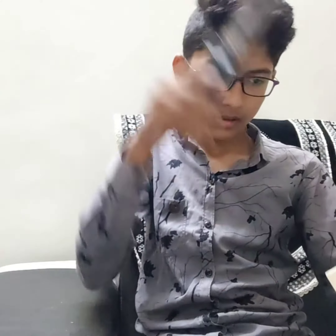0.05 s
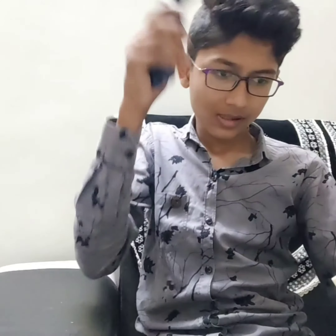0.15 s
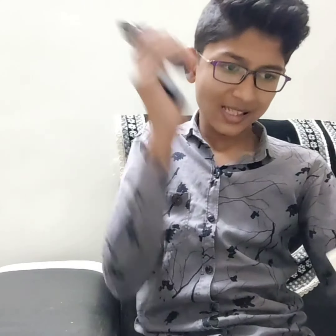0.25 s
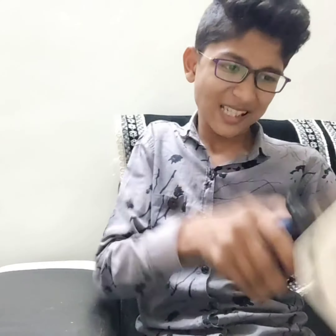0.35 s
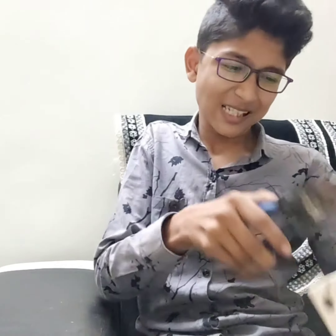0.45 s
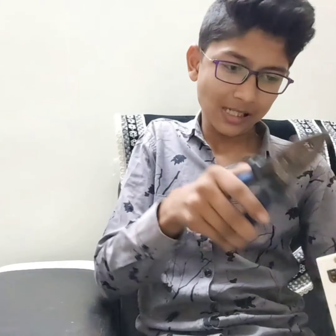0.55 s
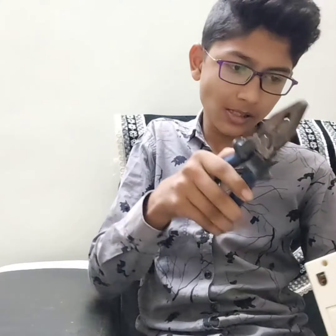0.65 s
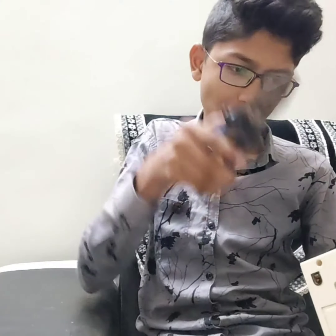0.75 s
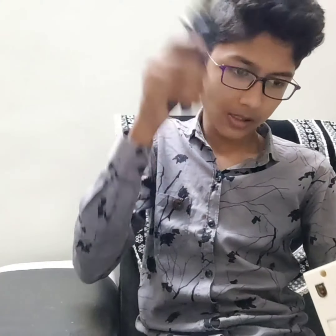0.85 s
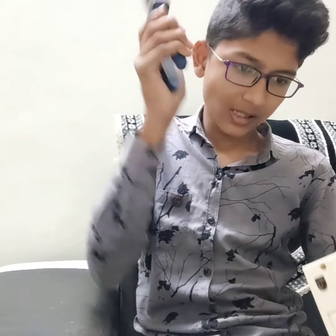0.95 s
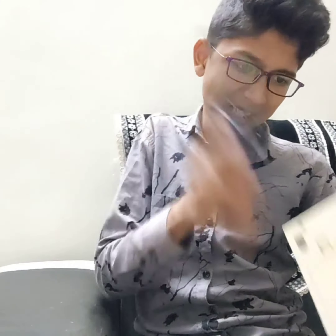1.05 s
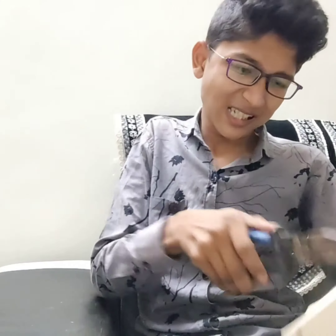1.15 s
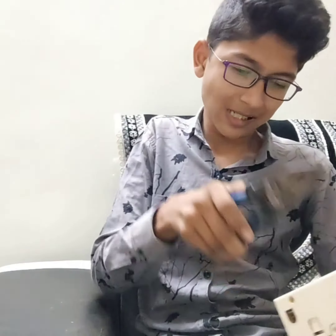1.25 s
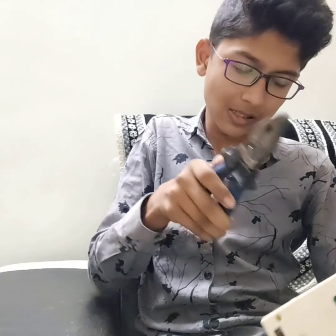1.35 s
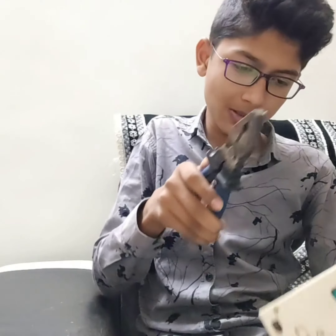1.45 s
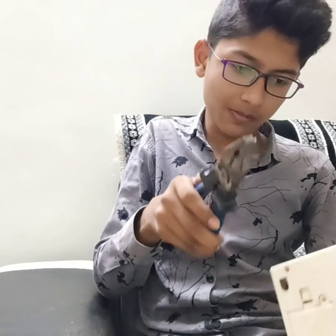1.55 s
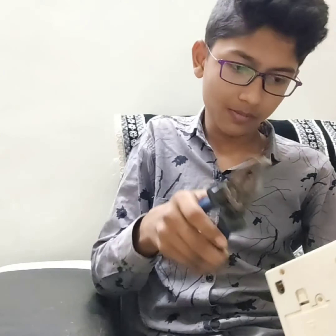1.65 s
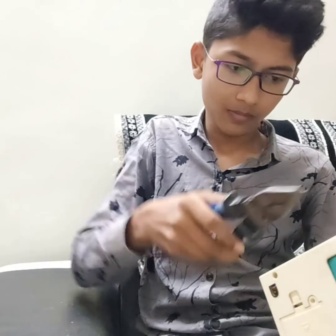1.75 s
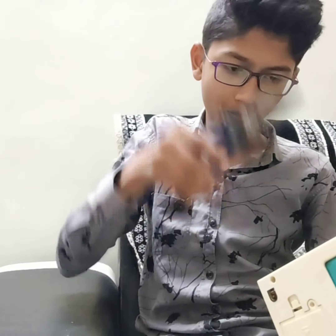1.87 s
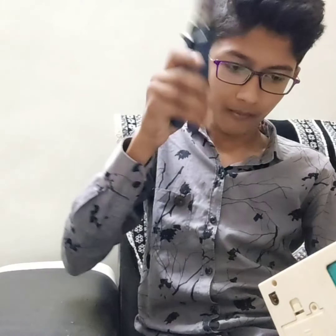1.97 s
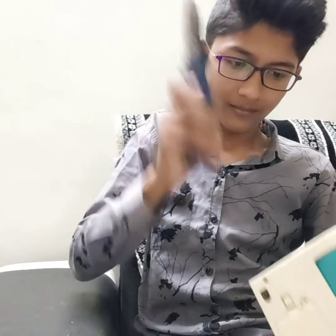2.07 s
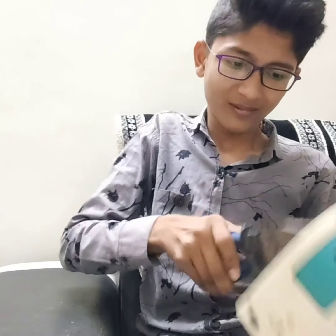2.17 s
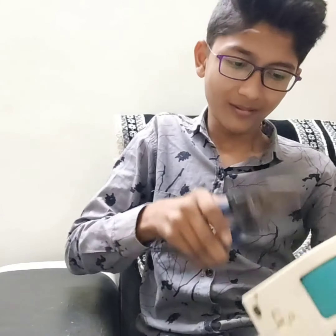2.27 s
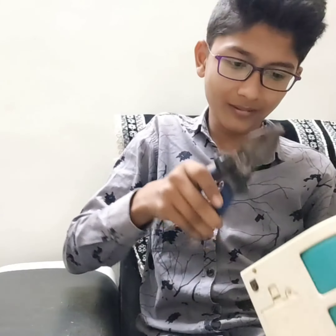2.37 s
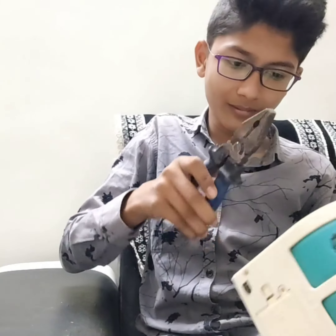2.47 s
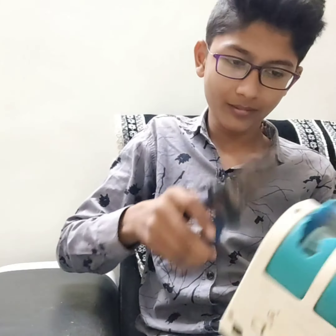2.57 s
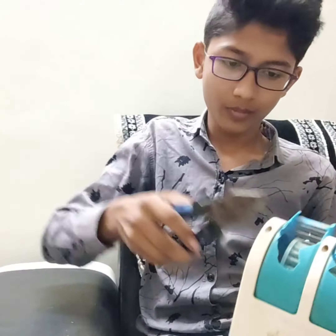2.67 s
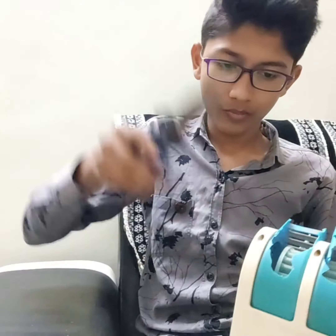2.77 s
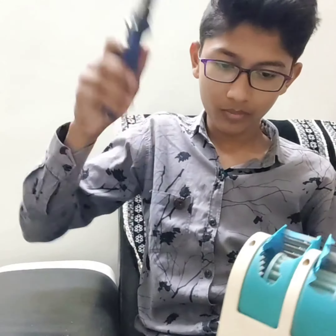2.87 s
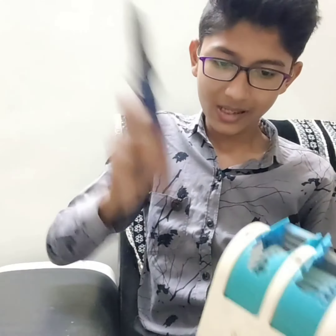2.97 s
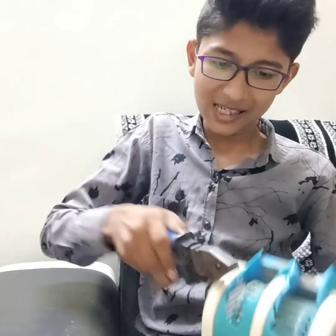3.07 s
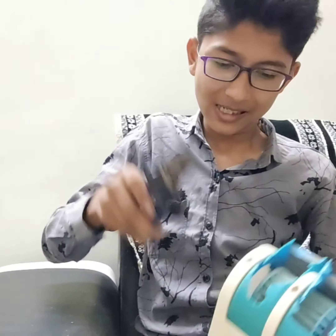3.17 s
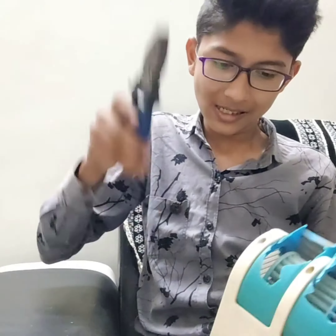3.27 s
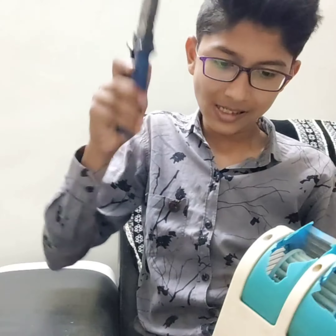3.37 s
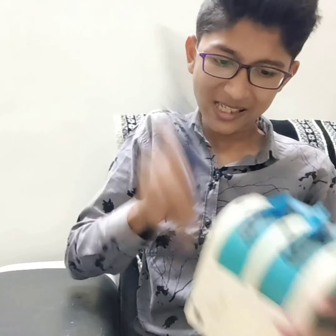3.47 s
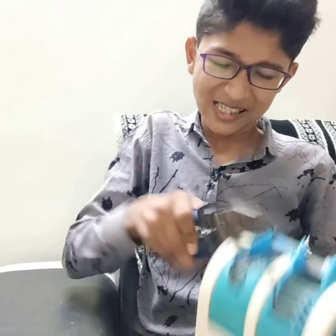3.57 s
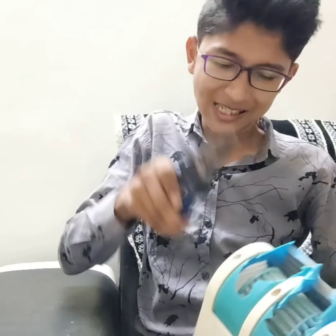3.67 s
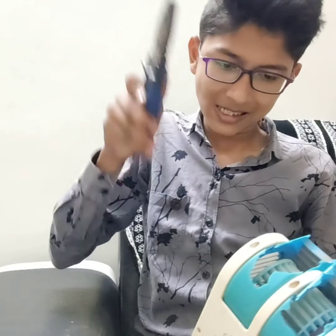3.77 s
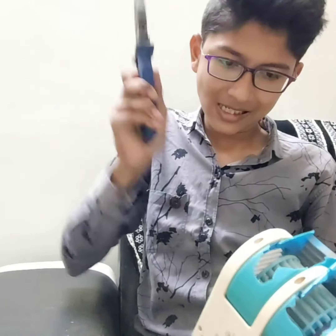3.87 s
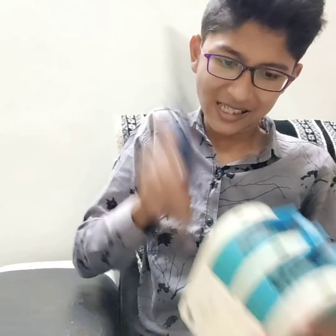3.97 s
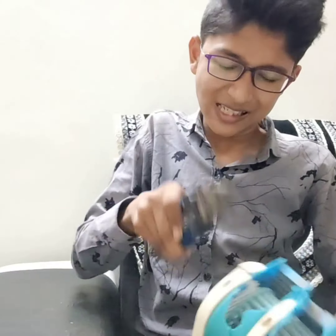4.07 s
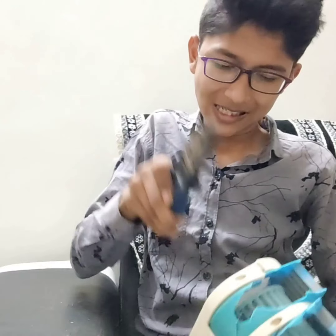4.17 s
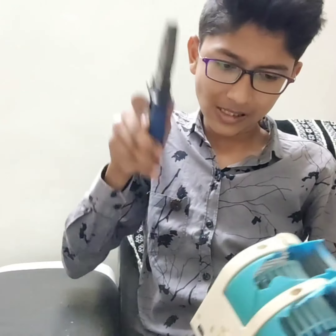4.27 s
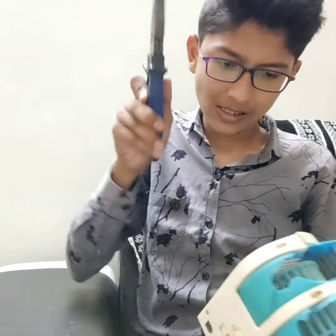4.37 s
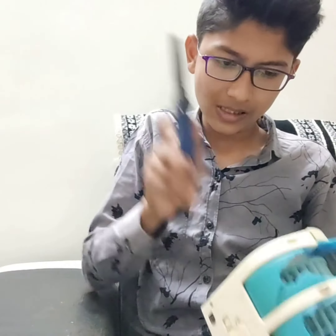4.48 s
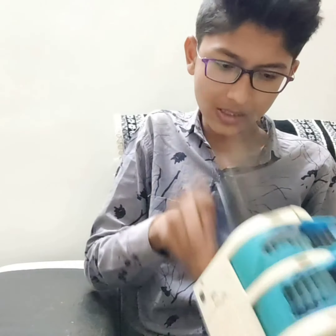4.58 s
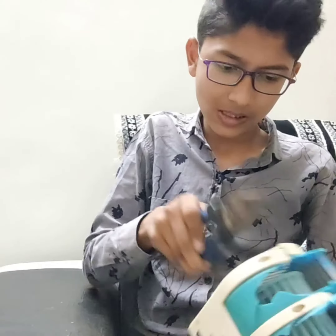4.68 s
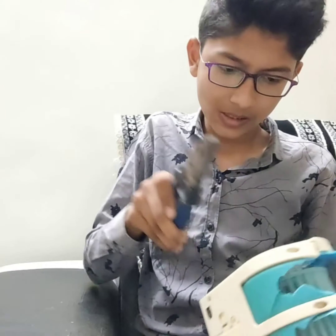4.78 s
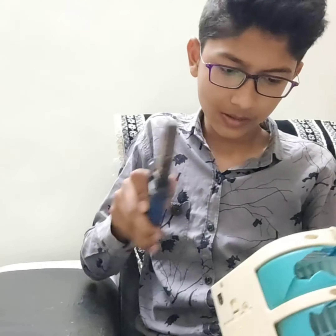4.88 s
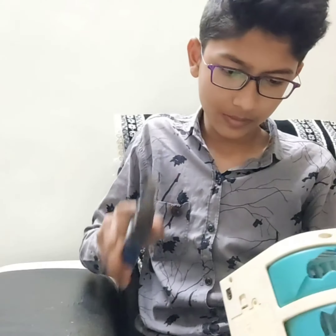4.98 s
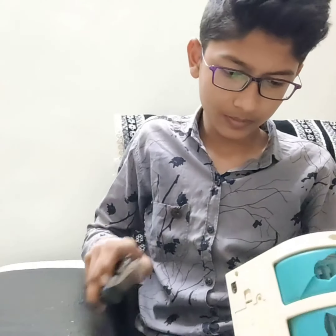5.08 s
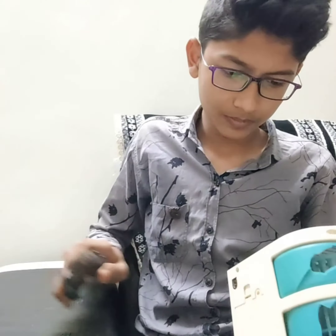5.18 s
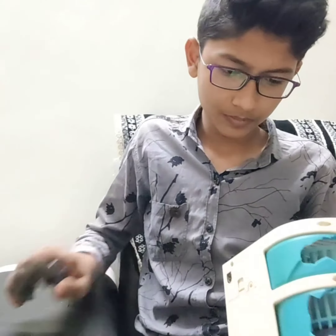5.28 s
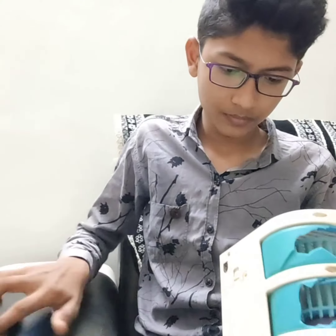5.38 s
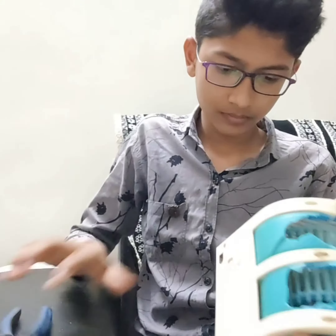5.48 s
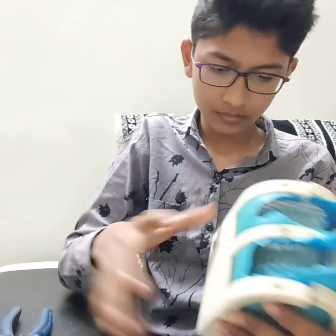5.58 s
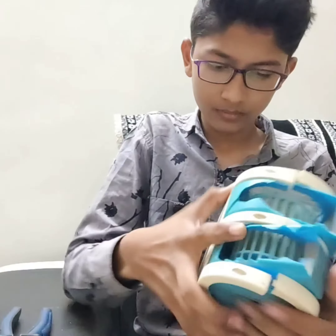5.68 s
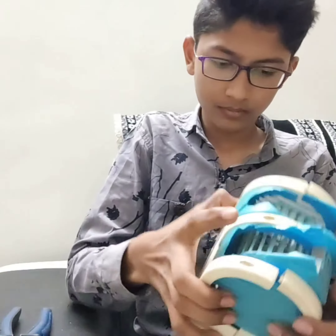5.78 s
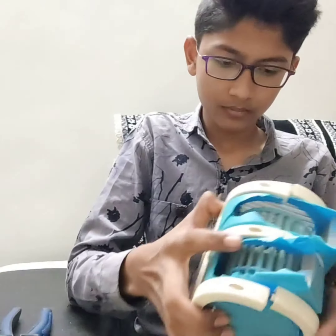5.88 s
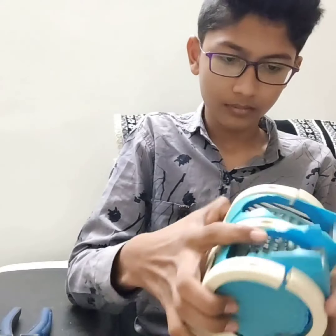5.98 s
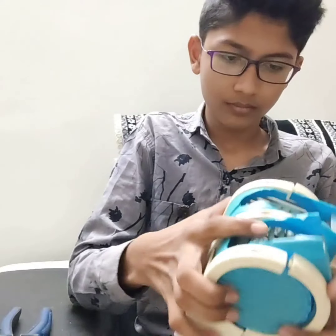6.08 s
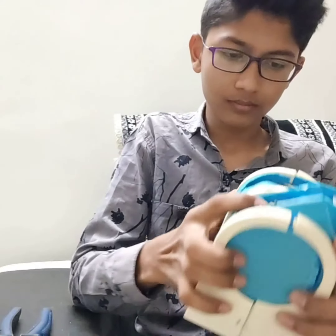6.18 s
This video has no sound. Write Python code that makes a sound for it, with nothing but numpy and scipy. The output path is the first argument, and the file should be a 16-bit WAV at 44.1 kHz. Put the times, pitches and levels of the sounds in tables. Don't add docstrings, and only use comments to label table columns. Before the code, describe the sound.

Splintery plastic blows with low lap thumps and hollow ringing, each filling an echoing hard-walled room over faint hiss. Thin steel clicks sit slightly left between early blows. The level ducks at each hit and recovers. The last crack is drier with loose pieces rattling, followed by a tool clacking onto a table, faint shard scratches and a final dull plastic knock.

```python
import sys
import numpy as np
from scipy import signal
from scipy.fft import rfft, irfft
from scipy.io import wavfile
from scipy.ndimage import uniform_filter1d, map_coordinates

SR = 44100
rng = np.random.default_rng(int(sys.argv[2]) if len(sys.argv) > 2 else 0)


def dump(signal):
    limited = np.clip(np.atleast_2d(signal).T, -1, 1)
    pcm = np.round(limited * 32767).astype(np.int16)
    wavfile.write(sys.argv[1], SR, pcm)


def field_ratio(decibels):
    return 10 ** (np.asarray(decibels, dtype=float) / 20)


N = 275079

# frequency in Hz, level in dB per Hz.
AIR_SPECTRUM = [(24, -42.5), (40, -11.5), (87, 1), (317, -4.5), (522, -8.5), (704, -5.5), (926, -13.5),
                (1080, -11.5), (1490, -18), (2220, -18.5), (3840, -27), (6160, -35), (6980, -24.5),
                (7910, -31), (15500, -38)]
# frequency in Hz, left-right likeness (-1 to 1).
AIR_LIKENESS = [(60, 0.92), (180, 0.94), (550, 0.67), (1650, 0.095), (4970, 0.16), (15000, -0.42)]
# centre in seconds, level in dB, half length in seconds.
SEAT_SHIFTS = [(.13, -49, 0.028), (.2, -48.5, .035), (.36, -52, .07), (.53, -44, .04), (.69, -41.5, 0.049),
               (.86, -46.5, 0.078), (1.122, -45.5, 0.058), (1.35, -50, 0.073), (1.67, -49, 0.058),
               (1.834, -46.5, 0.033), (2.15, -50, .04), (2.406, -45, .045), (2.572, -44.5, 0.023),
               (2.655, -49, .025), (2.745, -45, .035), (2.88, -45.5, 0.036), (3.043, -51, .04),
               (3.286, -51, 0.11), (3.44, -49.5, .025), (3.555, -53, .035), (3.97, -51, .035),
               (4.2, -57, .05), (4.6, -49, 0.041), (5.523, -44, 0.066), (5.96, -53, .05)]
# frequency in Hz, t60 in seconds.
ROOM_T60 = [(150, 0.37), (500, 0.49), (2000, 0.54), (6000, 0.51), (12000, 0.39), (16000, 0.37)]
# frequency in Hz, left-right likeness (-1 to 1).
ECHO_LIKENESS = [(100, .7), (500, 0.317), (1200, 0.021), (10000, 0.0088)]
# frequency in Hz, level over neighbours in dB.
STANDING_NOTES = [(318, 5), (480, 3), (577, 4), (632, 4), (668, 3), (733, 5), (824, 3), (868, 3), (908, 5),
                  (946, 4), (1096, 4), (1340, 3), (1540, 4), (1685, 4)]
# frequency in Hz, left-right difference in dB.
PORT_LEAN = [(100, 3.5), (500, -0.4), (2000, 0.7), (5000, 2.5), (9000, -2.5), (14000, 5.5)]
# start in seconds, level in dB, length in seconds.
TOOL_LAID = (5.447, -34.5, .03)
# start in seconds, peak in dB, crack t60 in seconds,
# treble tilt in dB per octave, room answer in dB.
HANDLING_KNOCKS = [(5.446, -36, .006, 1, -20), (5.4505, -20, .008, -1.5, -26), (5.461, -25, .015, -5, -11),
                   (5.572, -40, 0.0087, 1, -14), (5.686, -46, .05, 0.2, -5), (5.707, -40, .03, -1, -7),
                   (5.721, -39, .04, 1.2, -6), (5.965, -49, .04, 2, -9), (6.0761, -18, 0.013, -6.5, -14.5),
                   (6.0795, -21, .012, -7, -15.5), (6.083, -26.5, .012, -7, -16),
                   (6.14, -39.5, .012, 2, -14)]
# loudest time in seconds, level in dB, rise in seconds, fade in dB per second.
SHARD_SLIDES = [
    (5.48, -56, .015, 80),
    (5.735, -45.5, .035, 70),
    (5.96, -58, 0.066, 200),
    (6.077, -46.5, 0.0034, 500),
    (6.11, -61, .015, 60),
]
# frequency in Hz, width in Hz, level in dB.
HELD_MODES = [(574, 66, 1.5), (801, 70, 7), (1310, 100, 0), (2110, 150, -0.5)]
# start in seconds, peak in dB, ring frequency in Hz.
JAW_TICKS = [
    (1.8065, -21.5, 7020),
    (1.8096, -25, 7600),
    (1.9345, -39, 7000),
    (1.9557, -28, 7600),
    (2.086, -32, 7000),
    (2.158, -31, 7700),
    (2.165, -30, 7100),
    (2.1765, -37, 7600),
    (3.5194, -42, 6960),
    (4.0253, -38, 7100),
]
# start in seconds, force in dB before the gain control, thump in dB,
# treble tilt in dB per octave, room answer in dB.
SHELL_BLOWS = [
    (0.4216, 17.5, -13, 1.05, -7),
    (1.156, 18.5, -18.5, 0.9, -8.5),
    (2.199, 10, -18.5, 0.46, -5.5),
    (2.68, -8, -43, -1.5, -13),
    (3.108, 9, -16, 1.2, -4.5),
    (3.582, 13, -16, 1.2, -6.5),
    (4.053, 12.5, -18, 1.1, -8),
    (4.641, 12, -36, 0.3, -15),
]
# frequency in Hz, width in Hz, level in dB.
SHELL_MODES = [
    [(348, 26, -0.5), (684, 140, -2), (2230, 29, -5), (3075, 70, -1)],
    [(504, 94, 1.5), (750, 160, -1.5), (2180, 110, -9), (3660, 220, -9)],
    [(528, 97, -4.5), (888, 78, 2.5), (1520, 210, -1), (2320, 73, -6)],
    [(900, 180, -2), (1473, 30, 4.5), (3400, 180, -7.5)],
    [(732, 36, -3), (1520, 110, -4.5), (2050, 60, -1), (3040, 57, -8)],
    [(730, 62, 0), (970, 170, -3), (1513, 51, -2), (2250, 68, -9)],
    [(733, 29, -3), (894, 45, 1), (1740, 190, -0.5), (3266, 54, -4)],
    [(923, 60, 1), (1575, 130, -2), (3390, 39, -5)],
]
THUMP_NOTES_HZ = [135, 150, 215, 150, 118, 112, 115, 200]
# frequency in Hz, level in dB per Hz.
CRACK_SPECTRUM = [(150, -42), (250, -11), (450, -8), (490, -2), (658, -4.5), (717, -2.5), (867, -4),
                  (961, -5.5), (1250, -5.5), (3160, -5.5), (5690, -13), (8470, -9), (15500, -18.5)]
# frequency in Hz, level in dB per Hz.
THUMP_SPECTRUM = [(40, -31.5), (90, 3), (130, -3), (200, 2.5), (350, -6), (700, -15.5), (1400, -40.5),
                  (3000, -91.5)]
# start in seconds, level in dB before the gain control, length in seconds.
LAP_BOUNCES = [
    (.44, -8.5, .008),
    (.45, -10, 0.0054),
    (.461, -10, 0.0084),
    (1.177, -8.5, 0.007),
    (1.2, -7.5, .012),
    (3.596, -11, .008),
]
# start in seconds, level in dB,
# # crack t60 in seconds, tilt in dB per octave, index of the blow followed.
LATE_CONTACTS = [
    (2.686, -20, .13, -3, 3),
    (4.652, -1, .1, -2, 7),
    (4.736, -16, .07, -1.5, 7),
]

TOP_HZ, STEADY_TOP_HZ = 16750, 15600
STANDING_WIDTH_HZ = 18
STILL_DB = -60.5
ROCK_DB, ROCK_S = -46, .05
RUMBLE_DB, STIRRED_DB, STIRRED_S = -56, 4, .11
KNOCK_THUMP_DB = -32
JAW_PAN_DB, JAW_ECHO_DB = 3.5, -14
THUMP_S, CRACK_T60_S, PIECE_ROOM_DB = .02, .05, -12
KNEE_DB, DUCK_SHARE = -14, .6
HOLD_S, HOLD_S_PER_DB = .098, .0033


def unit(x):
    return x / np.sqrt(np.mean(x ** 2) + 1e-20)


def along(points, hz):
    f, v = np.transpose(points)
    return np.interp(np.log(hz + 1), np.log(f + 1), v)


def curve(rows):
    return np.interp(np.arange(N) / SR, *np.transpose(rows))


def wobble(rate):
    knots = rng.standard_normal(int(N * rate / SR) + 4)
    return map_coordinates(knots, [np.arange(N) * rate / SR])


def noise(size, gain, alike, order=1024):
    hz, t, z = signal.stft(rng.standard_normal((2, size)), SR, nperseg=order)
    turn = np.arccos(np.clip(along(alike, hz), -1, 1))[:, None] / 2
    mid, side = z[0] * np.cos(turn), z[1] * np.sin(turn)
    still = np.sqrt(np.mean(gain(hz[:, None], 0 * t[:1]) ** 2))
    shaped = np.array([mid + side, mid - side]) * gain(hz[:, None], t) / still
    return signal.istft(shaped, SR, nperseg=order)[1][:, :size]


def add(track, s, sound):
    skip = max(0, -round(s * SR))
    spot = track[:, max(0, round(s * SR)):][:, :sound.shape[1] - skip]
    spot += sound[:, skip:skip + spot.shape[1]]


def peak(hz, centre_hz, width_hz):
    return 1 / (1 + (2 * (hz - centre_hz) / width_hz) ** 2)


def sustained(hz):
    return 1 / (1 + (hz / STEADY_TOP_HZ) ** 200)


def room_tone():
    t = np.arange(N) / SR
    low = lambda hz: 1 / (1 + (hz / 450) ** 4)
    murmur = noise(N, lambda hz, _: peak(hz, 100, 100) * hz / (hz + 40), [(100, 0.51)], order=4096)
    murmur = murmur / np.sqrt(np.abs(uniform_filter1d(murmur ** 2, size=1600)) + .15)

    seat = field_ratio(STILL_DB + 2.5 * wobble(7))
    seat = seat + sum(field_ratio(db) * np.exp(-((t - s) / half_s) ** 2) for s, db, half_s in SEAT_SHIFTS)
    since = np.maximum(t - np.array(SHELL_BLOWS)[:, :1], 0) / STIRRED_S
    rock = since * STIRRED_S / ROCK_S
    seat = seat + field_ratio(ROCK_DB) * np.max(rock * np.exp(1 - rock), axis=0)
    murmur = unit(murmur) * field_ratio(1.5 * wobble(18) + 2.5) * seat

    stirred_db = STIRRED_DB * np.max(since * np.exp(1 - since), axis=0)
    rumble_gain = lambda hz, _: (field_ratio(along(AIR_SPECTRUM, hz)) * np.sqrt(low(hz))
                                 / (1 + (150 / (hz + 1)) ** 4))
    rumble = noise(N, rumble_gain, AIR_LIKENESS, order=4096)
    rumble = rumble * field_ratio(1.5 * wobble(10) + RUMBLE_DB + stirred_db + 2.0)

    hiss_gain = lambda hz, _: field_ratio(along(AIR_SPECTRUM, hz)) * np.sqrt(1 - low(hz)) * sustained(hz)
    hiss = noise(N, hiss_gain, AIR_LIKENESS)
    port = noise(N, lambda hz, _: peak(hz, 6900, 600), [(7000, .1)]) * field_ratio(-70)
    return murmur + rumble + hiss * field_ratio(.8 * wobble(5) - 55.5) + port


def thud(db, length_s, lap_hz=118):
    t = np.arange(SR // 5) / SR
    lumps = unit(field_ratio(2.5 * unit(uniform_filter1d(rng.standard_normal(len(t)), size=150))))
    push = noise(len(t), lambda hz, _: field_ratio(along(THUMP_SPECTRUM, hz)), [(100, 0.31), (400, .05)], order=2048)
    push = push * lumps
    push += 1.4 * np.sin(2 * np.pi * lap_hz * t + np.array([[0], [1.4]]))
    return field_ratio(db - 8.8 * (t / max(length_s, .003)) ** 2) * push * (1 - np.exp(-t / 0.00053))


def strike(thump_db, thump_s, crack_t60, tilt_db, modes, room_db, lap_hz=118, size=SR):
    t = np.arange(size) / SR
    short = t[:SR // 5]
    ring = lambda hz: np.sqrt(1 + sum(field_ratio(2 * db + 9.5) * peak(hz, c, w) for c, w, db in modes))
    small = rng.standard_normal(size=200)
    small_hz = np.geomspace(200, 16000, len(small))
    ripple = lambda hz: field_ratio(3.3 * np.interp(hz, small_hz, small) / (1 + hz / 7000))
    tilted = lambda hz: field_ratio(along(CRACK_SPECTRUM, hz) + tilt_db * np.log2((hz + 200) / 2000))
    colour = lambda hz: tilted(hz) * ring(hz) * ripple(hz)

    splinters = unit(field_ratio(4 * unit(uniform_filter1d(rng.standard_normal(len(short)), size=24))))
    crack = noise(len(short), lambda hz, _: colour(hz), [(300, 1.0), (3000, 0.1)]) * splinters
    crack = crack * field_ratio(-60 * short / max(crack_t60, .003)) * (1 - np.exp(-short / .0003))

    standing_db = lambda hz: sum(db * peak(hz, c, STANDING_WIDTH_HZ) for c, db in STANDING_NOTES)
    dips_db = lambda hz: 1.5 / (1 + (hz / 2000) ** 4) + 2.5 * peak(hz, 620, 350)
    notes = lambda hz: field_ratio(standing_db(hz) - dips_db(hz))
    fading = lambda hz, u: sustained(hz) * notes(hz) * field_ratio(-60 * u / along(ROOM_T60, hz))
    walls = noise(size, lambda hz, u: colour(hz) * fading(hz, u), ECHO_LIKENESS, order=4096)
    walls = field_ratio(room_db) * walls * (1 - np.exp(-t / 0.0051))

    for c, w, db in modes:
        turn = rng.uniform(0, 2 * np.pi) + rng.normal(0, 0.71, (2, 1))
        decay = np.exp(-np.pi * max(w, 25) * short) * (1 - np.exp(-short / 0.00088))
        crack += field_ratio(db - 9.5) * decay * np.sin(2 * np.pi * c * short + turn)
    thump = thud(thump_db + 6.5, thump_s * np.sqrt(118 / lap_hz), lap_hz)
    add(walls, 0, field_ratio(1.5) * crack + thump)
    return walls


def handling():
    out, t = np.zeros((2, N)), np.arange(N) / SR
    add(out, TOOL_LAID[0], thud(*TOOL_LAID[1:]))
    for s, db, crack_t60, tilt_db, room_db in HANDLING_KNOCKS:
        modes = HELD_MODES if s > 5.6 else []
        knock = strike(KNOCK_THUMP_DB, .03, crack_t60, tilt_db, modes, room_db, size=SR // 2)
        add(out, s, field_ratio(db - 2.5) * knock)
    grit = field_ratio(3.6 * wobble(rate=500) + 2.2 * wobble(rate=90))
    scratch_db = lambda hz: along(CRACK_SPECTRUM, hz) - 3.5 * np.log2(hz / 2000 + .3)
    shards = unit(grit * noise(N, lambda hz, _: field_ratio(scratch_db(hz)) * sustained(hz), [(1000, 0.21)]))
    motion = sum(field_ratio(db - fade * np.maximum(t - s, 0)) * np.exp(-(np.minimum(t - s, 0) / rise_s) ** 2)
                 for s, db, rise_s, fade in SHARD_SLIDES)
    return out + shards * motion


def jaws():
    out, t = np.zeros((2, N)), np.arange(SR // 3) / SR
    pan = field_ratio([[JAW_PAN_DB / 2], [-JAW_PAN_DB / 2]])
    for s, db, ring_hz in JAW_TICKS:
        bright = lambda hz: np.sqrt(2.5 * peak(hz, ring_hz, 350) + .6 / (1 + (9500 / (hz + 1)) ** 6))
        click = lambda hz, _: bright(hz) + .12 / (1 + (3500 / (hz + 1)) ** 6)
        tick = noise(len(t), click, [(5000, 0.25)]) * field_ratio(-60 * t / 0.0045)
        ring = field_ratio(-24 - 60 * t / .3 + 3 * wobble(rate=80)[:len(t)]) * np.sin(2 * np.pi * ring_hz * t)
        fading = lambda hz, u: bright(hz) * sustained(hz) * field_ratio(-60 * u / along(ROOM_T60, hz))
        echo = noise(len(t), fading, ECHO_LIKENESS)
        echo = field_ratio(JAW_ECHO_DB) * echo * (1 - np.exp(-t / 0.008))
        add(out, s, field_ratio(db + 1.0) * ((tick + ring) * pan + field_ratio(-10) * echo))
    return out


def blows():
    out = np.zeros((2, N))
    earlier = strike(-20, .03, .03, .1, SHELL_MODES[0], room_db=1.0)
    add(out, -.3, field_ratio(-12.5) * earlier)
    for (s, db, thump_db, tilt_db, room_db), modes, lap_hz in zip(SHELL_BLOWS, SHELL_MODES, THUMP_NOTES_HZ):
        blow = strike(thump_db, THUMP_S, CRACK_T60_S, tilt_db, modes, room_db, lap_hz, size=SR * 4 // 5)
        add(out, s, field_ratio(db - 4.5) * blow)
    for s, db, crack_t60, tilt_db, index in LATE_CONTACTS:
        modes = SHELL_MODES[round(index)]
        piece = strike(-40, THUMP_S, crack_t60, tilt_db, modes, PIECE_ROOM_DB, size=SR // 2)
        add(out, s, field_ratio(db) * piece)
    for s, db, length_s in LAP_BOUNCES:
        add(out, s, thud(db, length_s))
    return out


def scene():
    return blows() + handling() + jaws() + room_tone()


def gain_control():
    knots = [(0, 0)]
    for s, db, _, _, room_db in SHELL_BLOWS:
        duck_db = DUCK_SHARE * max(db - KNEE_DB, 0)
        held = max(HOLD_S + HOLD_S_PER_DB * (db + room_db), .045)
        knots += [(s - .012, 0), (s - .004, -duck_db), (s + 0.041, -.75 * duck_db),
                  (s + held, -.55 * duck_db), (s + held + 0.058, -.08 * duck_db), (s + held + 0.35, 0)]
    return field_ratio(curve(knots))


def low_pass(x):
    return signal.sosfilt(signal.butter(12, 16780, fs=SR, output="sos"), x)


def record(dry):
    hz = np.fft.rfftfreq(N, 1 / SR)
    lean = field_ratio(along(PORT_LEAN, hz) / 2 * np.array([[1], [-1]]))
    bass_cut = (1j * hz / (50 + 1j * hz)) ** 3
    notch = field_ratio(-5 * peak(hz, 5710, 600))
    band_limit = field_ratio(-60 / (1 + np.exp((TOP_HZ - hz) / 90)))
    x = dry * gain_control()
    x = x / (1 + np.abs(x / .76) ** 6) ** (1 / 6)
    x = irfft(rfft(x) * lean * bass_cut * notch * band_limit, N)
    return low_pass(x)


dry = scene()
out = record(dry)
dump(out)
```